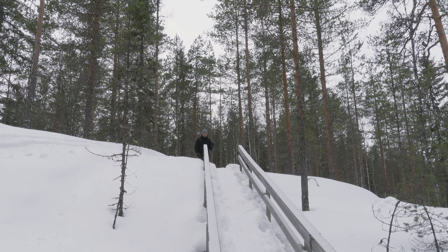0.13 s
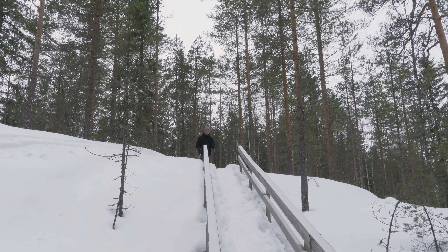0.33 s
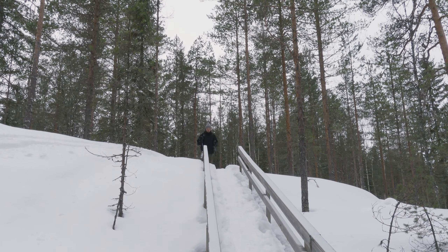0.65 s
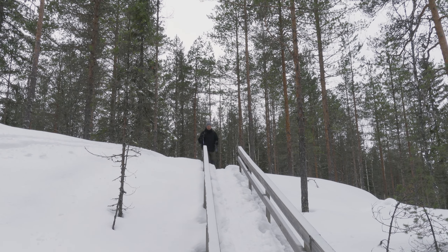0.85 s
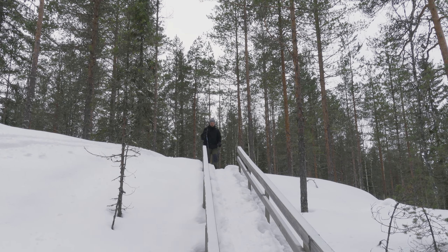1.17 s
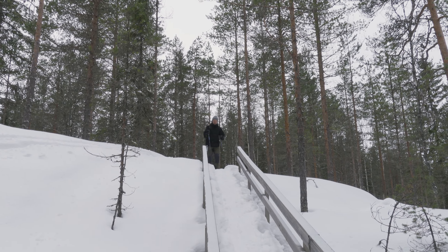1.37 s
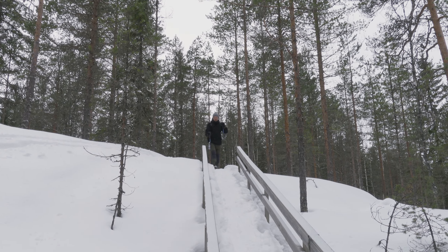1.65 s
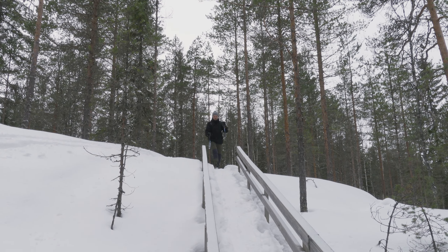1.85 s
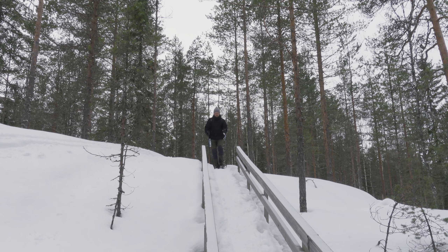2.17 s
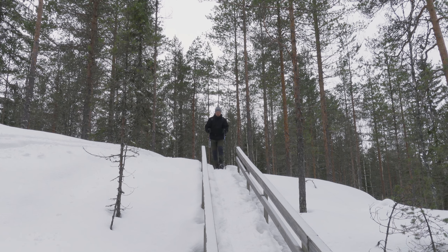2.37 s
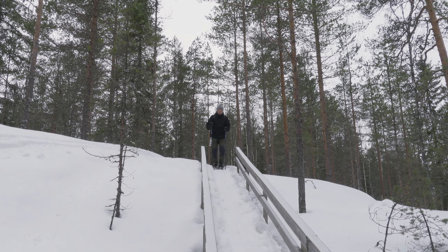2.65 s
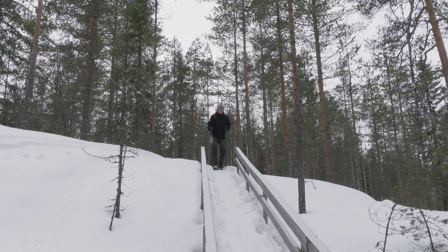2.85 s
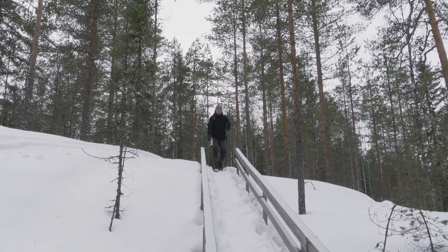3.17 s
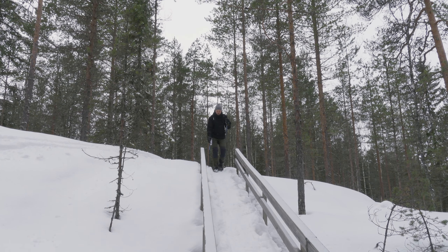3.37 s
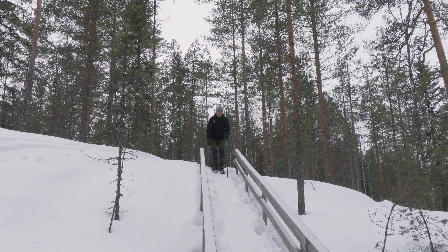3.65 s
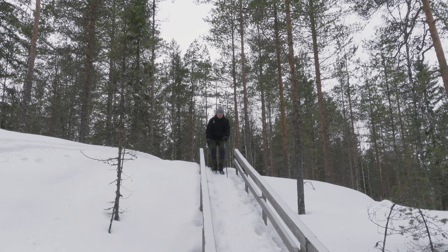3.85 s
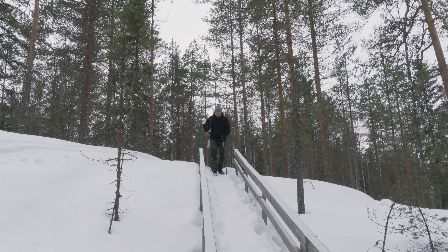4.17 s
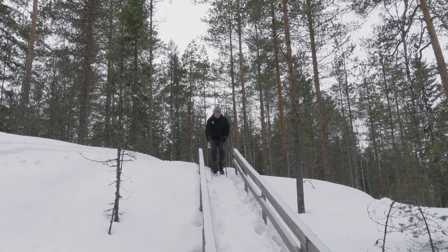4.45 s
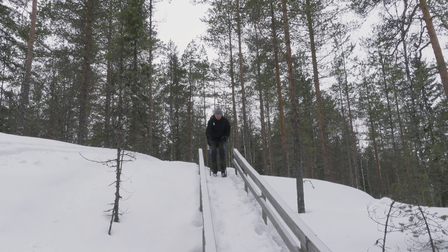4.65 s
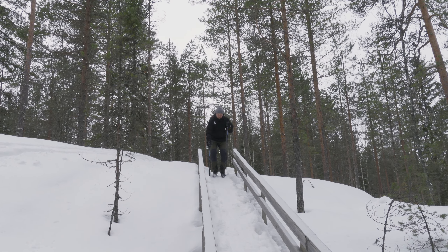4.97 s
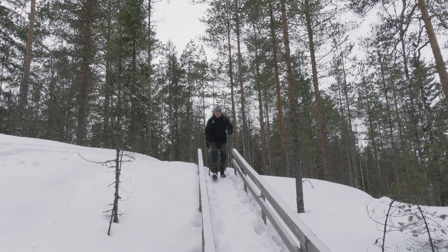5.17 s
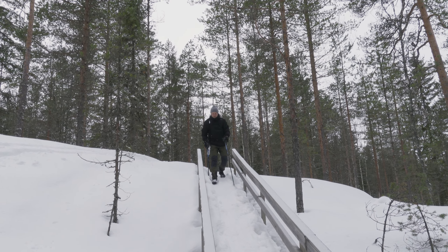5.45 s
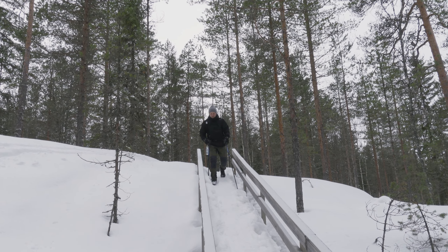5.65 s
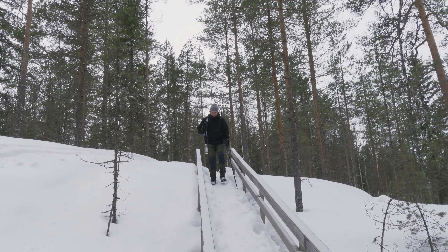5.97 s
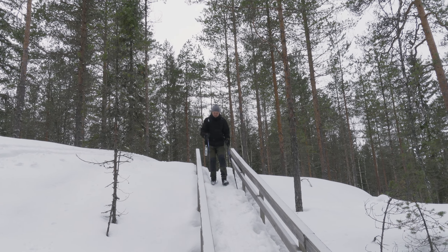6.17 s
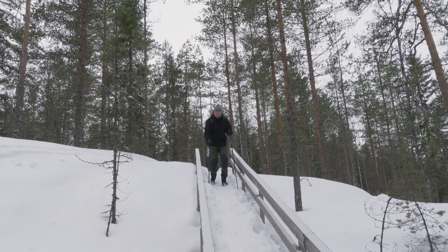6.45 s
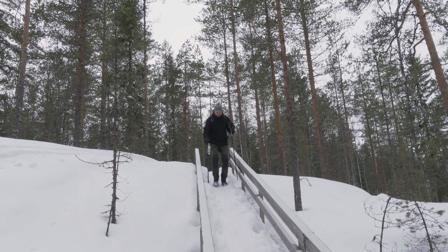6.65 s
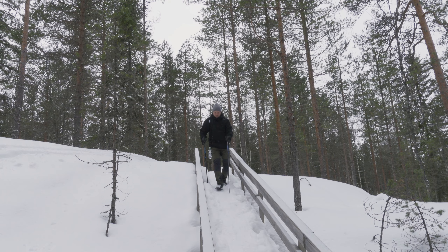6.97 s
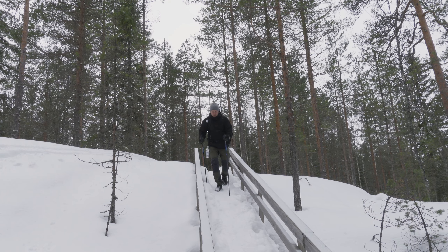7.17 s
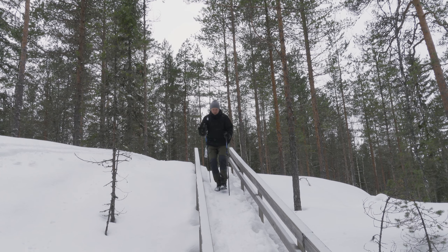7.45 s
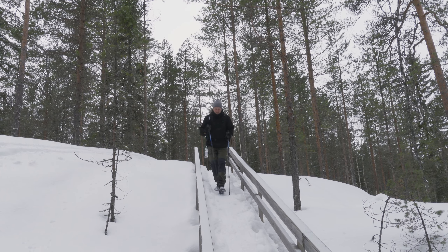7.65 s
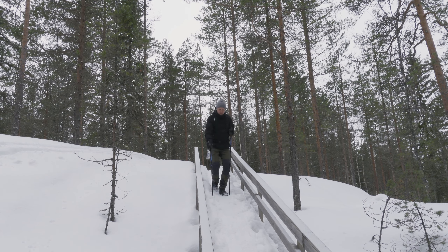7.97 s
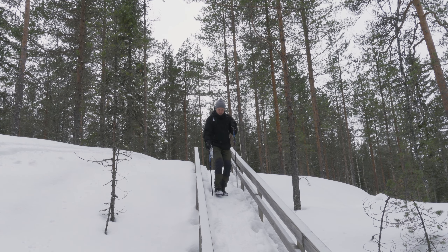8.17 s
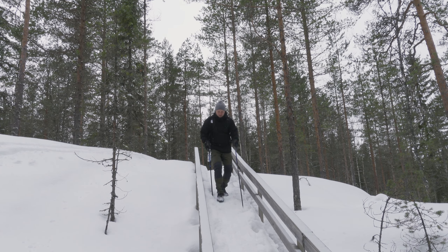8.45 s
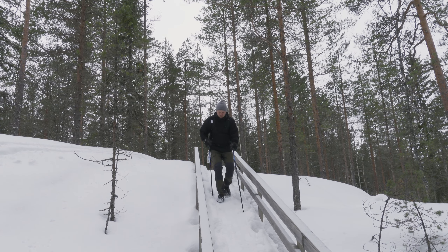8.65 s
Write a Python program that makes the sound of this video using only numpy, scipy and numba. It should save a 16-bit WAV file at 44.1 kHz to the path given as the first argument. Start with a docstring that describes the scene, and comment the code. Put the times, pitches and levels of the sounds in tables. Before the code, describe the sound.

Low wind rumbles and buffets on a small mono microphone throughout, with a very faint hush of air in distant pines. A walker with trekking poles approaches down snow-packed wooden steps. For the first three seconds there are only faint, scattered crunches and small cracks of crust, the clearest near 1.7 and 2.3 seconds. From 3 to about 6.3 seconds the crunching is louder and nearly continuous: boots press and slide through icy snow, pole tips knock and drag with a slight ring in the shafts, and the snow squeaks briefly. Soft, low thuds come from the treads, the strongest with a crack at 6.4 seconds. After a short lull, steps resume around 7 seconds, with a sharp pole knock at 7.8, a strong crunch at 8.1 and the sharpest crack at 8.6, followed by a little more crunching until nearly 9 seconds.

```python
"""A pine forest, at the foot of snow-packed wooden steps; mono, one small camera microphone.
A walker with trekking poles comes down towards it. Boots crush, crack and slide on the crust, a stream of
snapping ice crystals, and the treads thud. Pole tips tick, knock and drag, the shafts ring, cold snow
squeaks. Wind rumbles right on the microphone; far behind is a faint hush of air in the pines."""
import sys
import numpy as np
from scipy import signal
from scipy.fft import rfft, irfft
from scipy.io import wavfile
from scipy.ndimage import uniform_filter1d, map_coordinates
from numba import njit

SR = 44100
rng = np.random.default_rng(int(sys.argv[2]) if len(sys.argv) > 2 else 0)


def log_audio(samples):
    """Write samples as a 16-bit WAV file to the path given in sys.argv[1]."""
    # one column per channel
    frames = np.atleast_2d(samples).T
    # limit to full scale, then quantise
    limited = np.clip(frames, -1, 1)
    pcm = np.round(limited * 32767).astype(np.int16)
    wavfile.write(sys.argv[1], SR, pcm)


N = 388962

# boots and tips pressing or sliding: t/s, swell/s, hold/s, fade/s, crush level/dB,
# offsets from it of icy treble/dB, fine hiss/dB and deep packing/dB, hollow under the sole f/Hz
CRUNCHES = [ (0.343, .005, 0.11, 0.064, -71.5, -11, -21, -5, 2940),
            (0.945, .01, 0.083, .12, -73, -15, -18, -3, 2700),
            (1.272, .01, .06, .08, -76.5, -6, -13, 7, 2350),
            (1.485, .006, .005, 0.038, -70, -11, -17, -4, 3000),
            (1.747, 0.014, 0.013, 0.047, -55.5, -10, -20, -7, 4300),
            (1.797, 0.062, 0.049, 0.011, -62, -3.5, -23, 0.5, 2600),
            (1.923, 0.021, 0.016, .02, -66, -21, -21, 6, 2280),
            (2.182, 0.011, 0.036, 0.033, -57, 5, 1.5, -2.5, 4180),
            (2.577, 0.011, 0.014, 0.011, -50.5, -30, -34, -11, 3600),
            (3.008, 0.019, 0.6, .01, -60, -10.5, -18, -9, 3400),
            (3.076, 0.079, .005, 0.045, -50.5, -25, -29, -5, 2940),
            (3.19, 0.067, .005, 0.18, -53, -17, -19, -7, 3150),
            (3.338, 0.095, 0.018, 0.12, -53, -13.5, -13, -11, 3520),
            (3.5, 0.093, .005, .055, -52.5, -5, -32, -8, 4350),
            (3.62, 0.066, .005, .08, -56.5, -12, -15, -2, 3500),
            (3.717, .025, .004, 0.025, -43, -18, -20, -12, 2580),
            (3.755, 0.0055, .1, .04, -50, -10.5, -26, -6.5, 2700),
            (3.842, 0.087, .11, 0.02, -53, -6.5, -16, -2, 2500),
            (4.053, 0.02, .002, 0.013, -54.5, -12, -19, 1.5, 2420),
            (4.058, 0.0085, 0.034, 0.27, -61.5, -17, -19, 8, 2390),
            (4.291, 0.0054, 0.069, .02, -55, -17, -29, -11, 3800),
            (4.33, .045, 0.029, 0.014, -51, -15, -28, -18, 3890),
            (4.462, 0.0055, 0.036, .02, -60, -10, -20, -14, 4350),
            (4.491, 0.042, .006, .012, -50, -15, -6, -8, 4180),
            (4.559, 0.0068, 0.02, 0.028, -48, -21, -22, -10.5, 2800),
            (4.59, .008, 0.16, .05, -59, -22, -24, -7.5, 2950),
            (4.69, 0.056, 0.15, 0.067, -55, -11.5, -14, -7, 3570),
            (4.909, 0.016, .004, 0.096, -52.5, -6.5, -14, -4.5, 4020),
            (5.15, 0.011, .004, .14, -63.5, -5, -8, 0, 3000),
            (5.322, .006, .004, .07, -57.5, -12, -11, -9, 3790),
            (5.362, 0.0067, 0.096, .01, -57, -11, -16, 0.5, 3200),
            (5.464, .014, 0.012, 0.04, -44, -5.5, -12, -4, 2880),
            (5.534, 0.0054, .004, 0.21, -49.5, -8.5, -16, -3.5, 3200),
            (5.594, 0.026, .003, 0.021, -43.5, -20, -20, -9, 3850),
            (5.627, 0.024, 0.051, .03, -51.5, -7, -15, -8.5, 3550),
            (5.68, 0.042, 0.06, 0.065, -49, -9.5, -21, -11, 3300),
            (5.844, 0.013, 0.05, .03, -55.5, -10.5, -15, -9, 3250),
            (5.867, 0.073, .015, 0.064, -48, -6.5, -15, -12, 3500),
            (5.959, 0.028, 0.14, .012, -52.5, -12, -18, -13, 4000),
            (6.199, 0.013, .003, 0.043, -50.5, -7, -23, -2, 2570),
            (6.244, 0.035, 0.15, 0.037, -58.5, -7.5, -14, 0.5, 2600),
            (6.988, .028, .004, .065, -61, -8, -15, 9, 2420),
            (7.084, 0.0087, 0.09, .04, -65.5, -10, -18, 3, 2500),
            (7.205, 0.062, 0.042, 0.017, -58, -0.5, -5, -4.5, 3200),
            (7.34, .025, .005, .015, -68, -12, -14, -3, 2780),
            (7.368, 0.042, 0.024, 0.05, -63, -8, -13, -1, 3070),
            (7.71, 0.0044, 0.0054, 0.025, -47, -3.5, -14, -9, 4780),
            (7.729, 0.0087, 0.045, .03, -61.5, -12, -22, 4, 3300),
            (7.816, 0.013, .004, 0.16, -58, -12, -14, 6.5, 2350),
            (7.931, 0.0058, 0.095, .03, -53.5, 0.5, -14, -4, 3730),
            (7.975, 0.058, 0.043, 0.16, -50.5, -4.5, -9, -0.5, 3380),
            (8.144, 0.016, .005, 0.05, -38.5, -2.5, -14, -12, 3800),
            (8.177, 0.0078, 0.021, 0.026, -48.5, -9, -19, -3.5, 3480),
            (8.25, .008, .003, 0.018, -56.5, -8, -21, 0, 3450),
            (8.407, 0.0085, 0.04, 0.033, -65.5, 0.5, 2, 7.5, 2200),
            (8.455, .048, .005, 0.13, -57.5, -13, -6.5, 4.5, 2300),
            (8.561, 0.0046, .02, .08, -55, -9, -13, -3.5, 2600),
            (8.6, 0.032, .06, .02, -57, -13, -16, 0.5, 2500),
            (8.687, 0.0066, .04, 0.016, -46, -17, -20, -10.5, 3160),
            (8.744, 0.045, .004, 0.055, -52, -9, -15, -7, 2730)]
# faint snow rustle between crunches: t/s, crush level/dB, deep packing offset/dB
RUSTLE = [(.3, -87, 12), (.6, -84, 15), (.8, -79.5, 4), (1.3, -82, 7), (1.65, -78, 7.5), (2.05, -72.5, 1),
          (2.35, -72.5, -1), (2.55, -69, 2), (2.7, -74, 3.5), (2.95, -82, 2), (4.25, -67.5, -3),
          (4.45, -70.5, -12), (5.1, -76, -3), (5.3, -75.5, -6), (6.17, -66.5, -7), (6.52, -67.5, 4),
          (6.72, -79, 1), (6.92, -71, 0.5), (7.5, -69.5, -8), (7.68, -72, 2), (8.35, -65, -2.5),
          (8.82, -60.5, 7.5)]
# crushed snow as the microphone colours it: f/Hz, level/dB
SNOW_SPECTRUM = [(150, 3.5), (250, 5), (527, 3.5), (638, 1.5), (708, 1.5), (1230, 2), (1550, -2.5),
                 (2510, -4), (3620, -6.5), (5780, -11.5), (6410, -19), (8320, -8), (9890, -24),
                 (12500, -13.5), (15800, -25)]
# echo between boot and step: t/s, length/s, delay/ms, strength (negative comes back inverted)
HOLLOW_SLIDES = [(3.2, .5, 0.82, -.23), (4.28, .14, 0.79, 0.35), (4.46, .1, 0.75, 0.46),
                 (5.84, 0.3, 0.774, 0.3), (6.18, 0.33, 0.75, -.25)]
# pole tip dragging: t/s, length/s, share of the scrape's power that goes through the shaft
DRAGS = [(3.02, .68, .35), (3.75, .12, .3), (4.465, .08, .3), (4.6, .3, .2), (5.54, .26, .55),
         (5.87, .25, .6)]
# pole shaft resonances: f/Hz, relative level/dB
SHAFT_MODES = [(1920, -4), (2490, 0), (3040, 1.5), (3400, 0), (3850, 1.5), (4470, -1), (5300, -3),
               (7000, -14)]
# crust breaking under tip or heel: t/s, body peak/dB, treble offset/dB, low end offset/dB, f/Hz
CRACKS = [(0.3408, -44.5, -10, -13, 2330), (1.277, -60, -24, 5, 1980), (1.488, -62, -25, -12, 3500),
          (1.6876, -57.5, -18, 4, 1650), (1.749, -40.5, -9, -20, 5250), (1.9749, -56, -27, 1, 3570),
          (2.302, -35.5, -20, -9, 2420), (3.0848, -44, -15, -15, 2590), (3.7267, -36, -13, -19, 2960),
          (3.745, -32.5, -29, -25, 2480), (3.9698, -38, -25, -14, 2740), (4.0004, -36.5, -10, -18, 2560),
          (4.5316, -38, -9, -32, 4170), (4.567, -37.5, -29, -18, 3270), (4.9262, -42, -13, -10, 4600),
          (5.3553, -45, -10, -18, 5160), (5.481, -41, -19, -20, 2960), (5.544, -39, -15, -27, 3030),
          (5.607, -38.5, -19, -12, 3900), (6.007, -38.5, -12, -12, 4360), (6.211, -47, -13, -12, 2240),
          (6.3971, -34.5, -9.5, -4, 3560), (6.754, -58, -7, 8, 1910), (6.931, -55, -16, -13, 1620),
          (7.0942, -36, -19, -10, 3780), (7.205, -51, -22, -3, 1780), (7.419, -51, -1, -5, 5600),
          (7.429, -49, -1, -2, 5400), (7.934, -37, -2, -13, 5160), (8.1247, -41, 4, 1, 2150),
          (8.1524, -50, -6, -15, 4940), (8.2556, -47, -7, -16, 2380), (8.293, -50, -7, -12, 2810),
          (8.5653, -27, -16, -27, 2400), (8.6965, -46, -17, -16, 2510), (8.7256, -41, -19, -18, 3900)]
# tip or sole edge on wood or a frozen lump: t/s, peak/dB, f/Hz, decay/cycles
KNOCKS = [(1.953, -56, 584, 1.6), (2.661, -54, 509, 2.5), (3.141, -41.5, 800, 1.9), (3.697, -46, 707, 2.2),
          (4.016, -35.5, 1200, 4.3), (4.087, -38.5, 511, 1), (4.229, -52, 805, 2.5), (5.406, -48, 678, 1.9),
          (5.428, -38.5, 622, 1.3), (6.326, -35.5, 626, 1), (7.127, -44, 530, 0.88), (7.176, -47, 620, 1.5),
          (7.34, -45.5, 643, 1.2), (7.742, -42, 546, 0.94), (7.777, -37.5, 487, 1.2),
          (7.777, -27.5, 1370, 1.36), (7.826, -47, 513, 2.7), (7.882, -41, 781, 1.2),
          (8.124, -42, 1020, 6.7), (8.594, -49, 660, 2.3)]
# cold snow and the dragged shaft squeaking: t/s, length/s, f/Hz, level/dB
SQUEAKS = [(0.75, 0.068, 8260, -76), (0.332, 0.017, 4590, -59.5), (1.726, 0.062, 5220, -62),
           (1.75, .04, 8250, -66), (1.862, 0.049, 8150, -66), (3.079, 0.033, 2600, -55),
           (3.239, 0.1, 3480, -58), (3.244, 0.11, 8400, -65.5), (3.24, 0.067, 1900, -62),
           (3.393, 0.087, 1770, -69), (3.502, 0.14, 4430, -58.5), (3.55, 0.089, 7000, -60.5),
           (3.616, 0.28, 7050, -65), (3.782, .04, 2480, -53.5), (3.94, 0.023, 2670, -52.5),
           (4.462, 0.079, 5280, -59), (5.472, 0.036, 2970, -45), (5.534, 0.048, 3000, -56),
           (5.58, .21, 4470, -59), (5.599, 0.032, 3890, -49.5), (5.65, 0.11, 1950, -59),
           (5.675, 0.091, 7830, -56), (5.927, 0.195, 5300, -58), (5.89, 0.23, 2470, -64),
           (8.563, 0.023, 770, -46.5), (8.564, 0.012, 4080, -38.5), (2.294, 0.061, 3500, -68),
           (4.35, 0.06, 4350, -57), (6.0, .12, 11400, -69)]
# boots landing on the treads: t/s, peak/dB, f/Hz, t60/s
THUDS = [(2.289, -52.5, 138, 0.07), (3.742, -42.5, 183, 0.039), (4.085, -52, 139, 0.078),
         (4.524, -42, 147, 0.033), (4.817, -51, 184, 0.077), (6.389, -31, 163, 0.031),
         (7.093, -48, 147, 0.042), (7.335, -40.5, 167, 0.029), (7.7, -47, 180, 0.04),
         (7.822, -56, 175, 0.059), (7.988, -49, 141, 0.16), (8.125, -50, 209, 0.039),
         (8.563, -42, 222, 0.053)]
# wind on the microphone: t/s, slow swing level/dB, buffet level/dB, flutter level/dB
WIND_LEVELS = [(0.0, -34.5, -53, -70), (0.37, -41.5, -56, -69.5), (0.61, -31, -61.5, -68.5),
               (1.55, -40, -51.5, -73), (2.11, -35, -49.5, -70.5), (2.77, -34.5, -41.5, -67),
               (3.05, -31.5, -45, -66.5), (3.4, -37.5, -48, -66.5), (3.66, -31.5, -46, -66.5),
               (4.0, -41, -47.5, -63), (4.3, -32, -53, -66), (4.76, -36.5, -47.5, -69),
               (4.93, -30, -48.5, -69), (5.5, -35, -58, -68), (6.11, -31, -38.5, -64.5),
               (6.3, -35.5, -51, -61), (6.6, -39, -47.5, -67.5), (7.12, -31, -54, -67.5),
               (7.32, -39, -57, -61.5), (7.59, -32.5, -59, -69), (8.06, -40.5, -46.5, -70.5),
               (8.47, -33, -42.5, -62), (8.62, -35, -46, -59), (8.82, -39, -49, -64)]
# shape of the wind's rumble: f/Hz, level/dB
WIND_SPECTRUM = [(2.4, -41), (4.0, 2.5), (16, 4), (24, -5), (34, -8), (43, -14.5), (75, -24.5), (103, -31),
                 (188, -30.5), (221, -36.5), (300, -42), (390, -64), (660, -120)]
# distant air in the pines, with microphone hiss: f/Hz, level/dB
HUSH_SPECTRUM = [(150, -32), (250, -8), (366, -4.5), (696, -8), (786, -10.5), (887, -11.5), (1110, -15),
                 (1520, -18.5), (2940, -26.5), (3490, -26), (4150, -28.5), (8030, -31.5), (15800, -37)]

CRUSH_HZ, ICY_HZ, FINE_HZ = 1600, 6300, 9800  # lower band edges; deep packing lies below the crush


def crunches():
    """Boots and tips press and slide in the snow; coarse and fine crystals give way at different moments."""
    (crush_gain, icy_gain, fine_gain, deep_gain), hollow_hz = pressure()
    _, crush, icy, _ = snow_layers(grains(scatter_db=2.6, patch_db=2.1, patch_hz=90))
    icy = icy * undb(wander(40))
    fine = colour(grains(scatter_db=2.8, patch_db=2.4, patch_hz=80), SNOW_SPECTRUM, lo_hz=FINE_HZ)
    deep = colour(grains(scatter_db=2.9, patch_db=1.8, patch_hz=60), SNOW_SPECTRUM, hi_hz=CRUSH_HZ)
    # the squeezed pocket under the sole resonates and shifts with the load
    pocket = grains(scatter_db=2.0, patch_db=4.5, patch_hz=40)
    hollow = unit(swept_bandpass(pocket, hollow_hz, damping=0.39))
    scrape = pole_shaft(undb(-4.5) * crush + undb(-8.5) * hollow)
    slide = gap_echo(crush_gain * scrape + icy_gain * icy)
    return slide + fine_gain * fine + deep_gain * deep


def pressure(swing_db=18, rustle_icy_db=-8.5, rustle_fine_db=-15, rustle_hz=2550):
    """Each load swells, holds and fades over the rustle: gives four layer gains and the hollow's pitch."""
    t = np.arange(N) / SR
    times, db, deep_db = np.transpose(RUSTLE)
    power = (t > times[0]) * undb(2 * np.interp(t, times, db)) + 1e-18
    offsets_db = np.broadcast_arrays(0, rustle_icy_db, rustle_fine_db, np.interp(t, times, deep_db))
    layer_power = power * undb(2 * np.array(offsets_db))
    weighted_hz = power * rustle_hz
    for start, swell, hold, fade, db, icy_db, fine_db, deep_db, hz in CRUNCHES:
        cut = slice(int(start * SR), int((start + swell + hold + 4 * fade) * SR))
        age = t[cut] - start
        rising = np.maximum(1 - age / swell, 0)
        falling = np.maximum(age - swell - hold, 0) / fade
        power = undb(2 * (db - swing_db * (rising + falling)))
        layer_power[:, cut] += power * undb(2 * np.array([[0], [icy_db], [fine_db], [deep_db]]))
        weighted_hz[cut] += power * hz
    return np.sqrt(layer_power), weighted_hz / layer_power[0]


def grains(scatter_db, patch_db, patch_hz):
    """Ice crystals snapping: dense clicks, a few much larger, coming in patches."""
    return rng.standard_normal(N) * undb(scatter_db * rng.exponential(size=N) + patch_db * wander(patch_hz))


def snow_layers(crystals):
    """Split snapping crystals into deep packing, crush, icy treble and fine hiss."""
    edges = [0, CRUSH_HZ, ICY_HZ, FINE_HZ, SR]
    return [colour(crystals, SNOW_SPECTRUM, lo, hi) for lo, hi in zip(edges, edges[1:])]


def gap_echo(slide, bounces=4):
    """Long slides sound hollow as a short echo bounces between boot and step."""
    i, lag, gain = np.arange(N), np.zeros(N), np.zeros(N)
    for start, length, delay_ms, strength in HOLLOW_SLIDES:
        cut = slice(int(start * SR), int((start + length) * SR))
        lag[cut] = delay_ms * SR / 1000
        gain[cut] = np.clip(strength, -.9, .9) * signal.windows.tukey(len(i[cut]), .3)
    lag *= 1 + 0.0057 * wander(9.3)  # the gap trembles as the boot slides
    echoes = sum(gain ** k * map_coordinates(slide, [i - k * lag], order=3) for k in range(1, bounces + 1))
    return (slide + echoes) * np.sqrt(1 - gain ** 2)  # keeps the overall level


def pole_shaft(scrape, width_hz=260, shaft_db=-2):
    """A dragging tip turns part of the scrape into shaft modes that come and go as the grip shifts."""
    slip = grains(scatter_db=2.2, patch_db=2.5, patch_hz=54)
    share, modes = np.zeros(N), np.zeros(N)
    for start, length, part in DRAGS:
        cut = slice(int(start * SR), int((start + length) * SR))
        share[cut] = part * signal.windows.tukey(len(share[cut]), .2)
    for hz, db in SHAFT_MODES:
        mode = unit(ring(ring(slip, hz, width_hz), hz, width_hz))
        modes += undb(db + 3.2 * wander(10)) * mode
    return np.sqrt(1 - share) * scrape + np.sqrt(share) * undb(shaft_db) * unit(modes)


def cracks(rise_s=0.0018, hold_s=0.0049, fade_s=0.0034, crumble_s=0.026):
    """Crust breaks in a burst of crystals that holds briefly, then crumbles; the piece has a pitch."""
    deep, crush, icy, fine = snow_layers(grains(scatter_db=1.5, patch_db=2.5, patch_hz=300))
    out, t = np.zeros(N), np.arange(SR // 12) / SR
    after_hold = np.maximum(t - hold_s, 0)
    decay = np.exp(-after_hold / fade_s) + undb(-24) * np.exp(-after_hold / crumble_s)
    envelope = np.minimum(t / rise_s, 1) * decay
    for start, db, icy_db, deep_db, hz in CRACKS:
        cut = slice(int(start * SR), int(start * SR) + len(t))
        burst = envelope * ring(crush[cut], hz=4070, width_hz=8000)  # thin crust has little low end
        body = burst + 1.6 * ring(burst, hz, width_hz=hz * .16)
        fringe = undb(icy_db) * (icy[cut] + 0.25 * fine[cut]) + undb(deep_db) * deep[cut]
        out[cut] += undb(db) * (body / np.abs(body).max() + envelope * fringe / 2.14)
    return out


def knocks():
    """A tip or sole edge gives a short push that swings a few cycles and dies in the snow."""
    out, t = np.zeros(N), np.arange(SR // 50) / SR
    for start, db, hz, cycles in KNOCKS:
        i = int(start * SR)
        swing = np.sin(2 * np.pi * hz * t) * np.sqrt(hz * t) * np.exp(-2.5 * hz * t / cycles)
        out[i:i + len(t)] -= undb(db) * swing / np.abs(swing).max()
    return out


def squeaks():
    """Uneven slipping keeps one narrow resonance going, swelling and fading."""
    out = np.zeros(N)
    slip = grains(scatter_db=1.0, patch_db=2.0, patch_hz=35)
    for start, length, hz, db in SQUEAKS:
        cut = slice(int(start * SR), int((start + length) * SR))
        tone = unit(ring(slip[cut], hz, width_hz=140))
        out[cut] += undb(db) * signal.windows.tukey(len(tone), .4) * tone
    return out


def thuds(push_s=0.01):
    """A soft sole pushes the plank, which rings low and short."""
    out, t = np.zeros(N), np.arange(SR // 4) / SR
    for start, db, hz, t60 in THUDS:
        i = int(start * SR)
        envelope = (1 - np.exp(-t / push_s)) * np.exp(-np.log(1000) * t / t60)
        plank = envelope * np.sin(2 * np.pi * hz * t)
        out[i:i + len(t)] += (undb(db) * plank / np.abs(plank).max())[:N - i]
    return out


def microphone_wind(buffet_hz=24, flutter_hz=110):
    """Slow pressure swings right on the diaphragm, with quicker buffeting and flutter in the gusts."""
    times, *levels = np.transpose(WIND_LEVELS)
    slow_db, buffet_db, flutter_db = (np.interp(np.arange(N) / SR, times, db) for db in levels)
    slow = colour(rng.standard_normal(N), WIND_SPECTRUM, hi_hz=buffet_hz)
    # the flow bounds the swings, so their size varies less than that of free noise
    size = uniform_filter1d(np.abs(signal.hilbert(slow)), size=SR // 6)
    slow = unit(slow / (0.12 + size))
    buffet = colour(rng.standard_normal(N), WIND_SPECTRUM, lo_hz=buffet_hz, hi_hz=flutter_hz)
    flutter = colour(rng.standard_normal(N), WIND_SPECTRUM, lo_hz=flutter_hz)
    return undb(slow_db) * slow + undb(buffet_db) * buffet + undb(flutter_db) * flutter


def forest_hush(level_db=-66, swell_db=.7):
    """Distant air in the pines and microphone hiss, one smooth bed that swells a little."""
    return undb(level_db + swell_db * wander(2.2)) * colour(rng.standard_normal(N), HUSH_SPECTRUM)


def undb(db):
    """Decibels to gain."""
    return 10 ** (np.asarray(db) / 20)


def unit(x):
    """Scale to rms 1."""
    return x / np.sqrt(np.mean(x ** 2))


def wander(rate_hz):
    """Random levels held 1 / rate_hz seconds and smoothed twice; rms 1."""
    hold = int(SR / rate_hz)
    steps = np.repeat(rng.standard_normal(N // hold + 1), hold)
    return unit(uniform_filter1d(uniform_filter1d(steps, hold), hold)[:N])


def colour(x, spectrum, lo_hz=0, hi_hz=SR, order=6):
    """Shape x by (f/Hz, level/dB) points between two soft band edges; rms 1."""
    f = np.maximum(np.fft.rfftfreq(N, 1 / SR), 1)
    hz, db = np.transpose(spectrum)
    gain = undb(np.interp(np.log(f), np.log(hz), db))
    band = 1 / np.sqrt((1 + (lo_hz / f) ** (2 * order)) * (1 + (f / hi_hz) ** (2 * order)))
    return unit(irfft(rfft(x) * gain * band, N))


def ring(x, hz, width_hz):
    """One resonance, gain 1 at the centre."""
    return signal.lfilter(*signal.iirpeak(hz, hz / width_hz, fs=SR), x)


@njit
def swept_bandpass(x, hz, damping):
    """State-variable band-pass whose centre moves, gain 1 at the centre."""
    out, band_state, low_state = np.empty(len(x)), 0., 0.
    for i in range(len(x)):
        g = np.tan(np.pi * hz[i] / SR)
        band = (band_state + g * (x[i] - low_state)) / (1 + g * (g + damping))
        band_state = 2 * band - band_state
        low_state += 2 * g * band
        out[i] = damping * band
    return out


def scene():
    """Walker in front, wind on the microphone, forest behind; one channel."""
    walker = crunches() + cracks() + knocks() + squeaks() + thuds()
    return (walker + microphone_wind() + forest_hush())[None]


def record(dry):
    """The camera cuts the top treble steeply."""
    top_hz = 15850
    return signal.sosfilt(signal.ellip(10, .2, 60, top_hz, fs=SR, output="sos"), dry)


dry = scene()
out = record(dry)
log_audio(out)
```